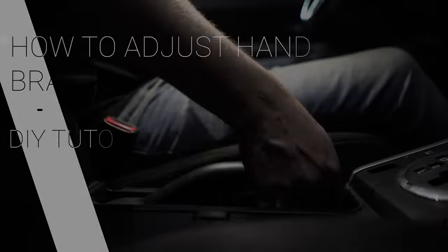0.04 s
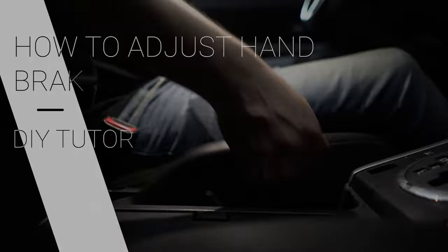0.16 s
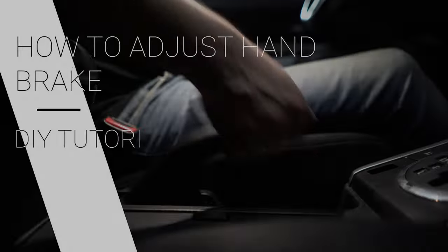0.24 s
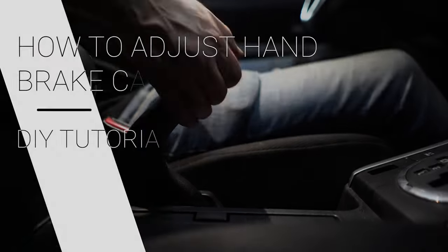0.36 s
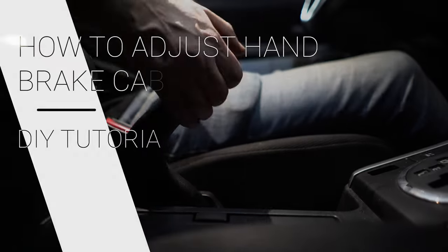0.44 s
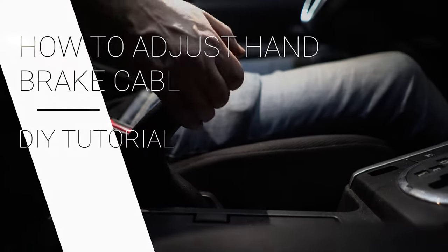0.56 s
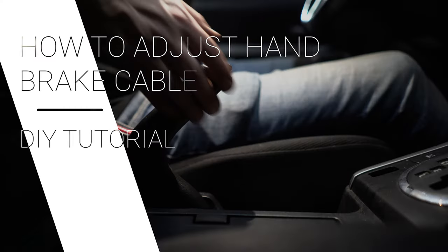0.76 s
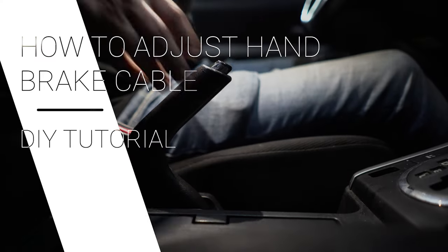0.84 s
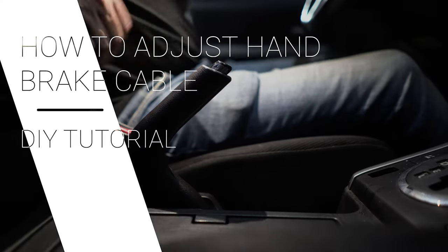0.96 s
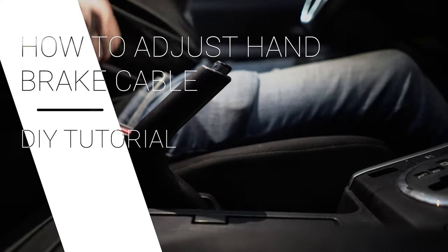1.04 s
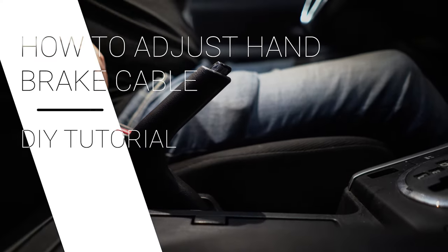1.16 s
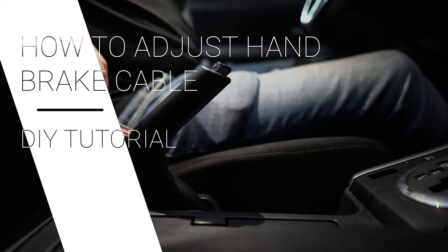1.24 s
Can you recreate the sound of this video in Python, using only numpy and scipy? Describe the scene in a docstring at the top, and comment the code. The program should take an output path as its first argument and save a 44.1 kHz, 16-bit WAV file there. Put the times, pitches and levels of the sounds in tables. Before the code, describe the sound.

Close stereo inside a still car cabin: faint soft thuds, then a fast crisp handbrake ratchet with hollow console knocks, a faint ring, a tiny squeak, and soft bumps as the hand lets go.

```python
"""Quiet parked-car cabin, seat rumble and a thud, then a handbrake pulled up over fifteen teeth.
The snaps quicken and slow again: bursts of coloured noise with tuned resonances of the ratchet plate,
the lever and the console, over a faint ring. Then the hand lets go with soft ticks, thuds and bumps
and one short squeak, while a sleeve rustles in filtered noise. Stereo, heard from inside the cabin."""
import sys
import numpy as np
from scipy import signal
from scipy.fft import rfft, irfft
from scipy.io import wavfile
from scipy.ndimage import uniform_filter1d

SR = 44100
rng = np.random.default_rng(int(sys.argv[2]) if len(sys.argv) > 2 else 0)


def store_wav(level_fs):
    """Save 16-bit WAV to argv[1]."""
    pcm = np.round(np.clip(np.atleast_2d(level_fs), -1, 1) * 32767)
    wavfile.write(sys.argv[1], SR, pcm.T.astype(np.int16))


N = 57330
T = np.arange(N) / SR
CUTOFF_HZ = 16000

# the pawl drops off each tooth: t/s, relative crack level/dB, relative knock level in the console/dB,
# treble tilt/dB per octave
PAWL_DROPS = [(0.2291, -5, 6.5, -0.5), (.2510, -4, 8, -0.5), (0.2672, -1.5, 3.5, -1),
              (0.2822, -3.5, 4.5, 0.5), (.2950, -1, 4, -.5), (0.307, -1, 3, 1), (0.3186, -1, 4, -2),
              (0.33, -2.5, -5.5, 2), (0.3401, 1, 3, 1.5), (0.351, 0.5, -0.5, -1), (0.3596, -1.5, -7, 1),
              (.3700, 0, 4.5, -1), (.3840, -4, 3.5, 1), (.4030, -2, 3, 1.5), (.4380, -5, -2, 0.5)]


def from_db(db):
    """Decibels to gain."""
    return 10 ** (np.asarray(db) / 20)


def rms_one(x):
    """Scale to unit rms."""
    return x / np.sqrt(np.mean(x ** 2) + 1e-20)


def at_hz(points, hz):
    """Read a table on a log-frequency axis."""
    f, v = np.transpose(points)
    return np.interp(np.log(np.maximum(hz, 1)), np.log(f), v)


def level(points):
    """Gain over time from rows of t/s, level/dB."""
    return from_db(np.interp(T, *np.transpose(points)))


def drift(rate):
    """Smooth random motion of rms 1: white noise averaged over 1/rate seconds."""
    return rms_one(uniform_filter1d(rng.standard_normal(N), max(1, int(SR / rate))))


def pan(hz):
    """Left and right gains of the cabin at these frequencies."""
    # f/Hz, level left minus right/dB
    side_balance = [(250, -0.5), (550, 0), (1000, -3), (2000, 0.1), (4000, 0.5), (8000, -4.4), (12000, 0.5)]
    return from_db(np.outer([.5, -.5], at_hz(side_balance, hz)))


def noise(spectrum):
    """Coloured stereo noise, alike in the bass and diffuse in the treble; rms 1."""
    # f/Hz, left-right correlation
    likeness = [(100, .999), (250, 0.96), (500, 0.88), (1000, 0.64), (2000, .28), (4000, 0.02),
                (12000, .02)]
    hz = np.fft.rfftfreq(N, 1 / SR)
    mid, side = np.exp(2j * np.pi * rng.random((2, len(hz))))
    alike = at_hz(likeness, hz)
    pair = np.sqrt(1 + alike) * mid + np.outer([1, -1], np.sqrt(1 - alike) * side)
    colour = from_db(at_hz(spectrum, hz)) * (hz < CUTOFF_HZ)
    return rms_one(irfft(pair * pan(hz) * colour, N))


def add(out, s, sound):
    """Mix a sound in at time s."""
    i = max(0, int(s * SR))
    out[:, i:i + sound.shape[1]] += sound[:, :N - i]


def burst(t, rise, hold, t60):
    """Rise, stay up until the hold time while the first reflections arrive, then die away."""
    return np.clip(t / rise, 0, 1) * from_db(-60 * np.maximum(t - hold, 0) / t60)


def touches(rows, spectrum, rise, hold, t60):
    """Light contacts (t/s, level/dB) that share one noise colour and decay."""
    return noise(spectrum) * sum(from_db(db) * burst(T - s, rise, hold, t60) for s, db in rows)


def background():
    """Quiet cabin background: coloured noise under a slow level curve."""
    # f/Hz, relative level/dB per Hz
    air_colour = [(30, -14), (90, 4), (250, -7), (500, -6), (800, -7), (1050, -0.5), (1350, 3.5),
                  (1650, -15.5), (2600, -13.5), (4000, -24), (9000, -51.5), (15000, -45)]
    # t/s, level/dB
    air_level = [(0, -76.5), (.2, -68), (.6, -64), (1.3, -68)]
    return level(air_level) * noise(air_colour)


def seat():
    """Low rumble of the seat and body as the driver moves: bass-heavy noise."""
    # t/s, level/dB
    seat_level = [(0, -83.5), (.12, -71), (.21, -60), (.5, -58.5), (.68, -63), (.86, -72), (1.02, -61),
                  (1.11, -61), (1.18, -74.5), (1.3, -61.5)]
    # f/Hz, relative level/dB per Hz
    rumble_colour = [(25, -13), (50, 1), (90, -0.5), (160, -8), (280, -14.5), (600, -25), (2000, -68)]
    return level(seat_level) * noise(rumble_colour)


def sleeve():
    """Cloth rubs in noise whose level flutters quickly about a slower curve."""
    # t/s, level/dB before the flutter
    sleeve_level = [(0, -91.5), (.18, -85), (.6, -84), (.73, -76.5), (.80, -71.5), (.86, -82.5),
                    (1.03, -76), (1.13, -70), (1.2, -68), (1.27, -68), (1.3, -73)]
    # f/Hz, relative level/dB per Hz
    cloth_colour = [(300, 4), (1500, -0.5), (4000, 1.5), (8000, -0.5), (12000, -6.5), (15500, -9.5)]
    flutter = from_db(1.4 * drift(250))
    return level(sleeve_level) * flutter * noise(cloth_colour)


def thuds():
    """Dull decaying sines: soft thuds before the pull and after it."""
    # t/s, level/dB, f/Hz, t60/s
    thud_rows = [(0.019, -65, 289, 0.055), (.104, -59.5, 472, 0.055), (0.174, -58.5, 416, 0.042),
                 (.958, -44.5, 113, 0.048), (.960, -56, 201.6, 0.24), (1.038, -77, 128, .2),
                 (1.076, -56.5, 49, 0.55), (1.211, -64, 139, 0.076), (1.237, -53, 229, 0.1)]
    rise_s = 0.0037
    out = np.zeros(N)
    for s, db, hz, t60 in thud_rows:
        envelope = burst(T - s, rise_s, rise_s, t60)
        out += from_db(db) * envelope * np.sin(2 * np.pi * hz * (T - s))
    return out


def button():
    """Light plastic ticks of the grip and button: short bright noise bursts."""
    # t/s, level/dB
    button_ticks = [(.100, -78), (.143, -71), (.171, -80), (.2075, -57), (.996, -63)]
    # f/Hz, relative level/dB per Hz
    plastic_colour = [(1200, 1), (2600, 5.5), (4000, 1), (7000, 2.5), (10000, -23), (15000, -10)]
    return touches(button_ticks, plastic_colour, rise=.001, hold=.005, t60=.05)


def trim():
    """The hand brushes and bumps the trim: soft, dull noise bursts."""
    # t/s, level/dB
    trim_bumps = [(.172, -67.5), (1.040, -75), (1.092, -66.5), (1.204, -55.5), (1.220, -66)]
    # f/Hz, relative level/dB per Hz
    bump_colour = [(80, -3), (250, -2), (600, -0.5), (1000, -1), (1700, -5), (2300, -9.5), (3300, -13),
                   (5000, -21), (8000, -46), (15000, -57)]
    return touches(trim_bumps, bump_colour, rise=.002, hold=.008, t60=0.11)


def linkage():
    """Small knocks of the linkage: noise bursts strongest in the midrange."""
    # t/s, level/dB
    linkage_ticks = [(.2075, -59.5), (.898, -56), (.903, -58.5), (.953, -59), (.959, -60)]
    # f/Hz, relative level/dB per Hz
    tick_colour = [(200, -11), (650, -12), (900, 6), (1500, -2.5), (2250, 7), (2900, -12.5), (5000, -8),
                   (8000, -13.5), (12000, -18), (15500, -57)]
    return touches(linkage_ticks, tick_colour, rise=.001, hold=.002, t60=0.079)


def tooth_colour(hz):
    """Every tooth favours its own narrow patches of the treble."""
    spread_db, width_hz, full_from_hz = 3.3, 240, 2000
    knots = np.arange(0, SR / 2, width_hz)
    patches = np.interp(hz, knots, rng.standard_normal(len(knots)))
    patches = patches * np.minimum(hz / full_from_hz, 1)
    return rms_one(from_db(spread_db * patches))


def pawl(size=8192):
    """Each snap excites the ratchet's dense, short-lived resonances, partly the same on every tooth."""
    # f/Hz, relative level/dB per Hz
    crack_colour = [(120, -9.5), (310, -5), (520, -4.5), (750, -5.5), (1050, -1.5), (1400, -7),
                    (2000, -4.5), (2800, -2.5), (3500, -3.5), (4700, -2), (6000, -1.5), (7600, -2),
                    (8500, -7.5), (12000, -8.5), (15500, -16.5)]
    # f/Hz, t60/s
    crack_decay = [(200, .06), (1500, 0.069), (5000, 0.046), (14000, 0.034)]
    crack_db, rise_s, hold_s = -28.5, 0.0004, 0.006
    shared_power = 0.36  # share of the crack that is the same on every tooth
    direct_gain, direct_s = 0.37, 0.0014  # the direct snap stands above its reflections
    grain_db, grain_per_s = 1.5, 270
    out, t = np.zeros((2, N)), T[:size]
    hz = np.fft.rfftfreq(size, 1 / SR)

    # overlapping bands, each with its own decay
    centres = np.geomspace(250, 16000, 7)
    bands = np.array([at_hz(np.c_[centres, one], hz) for one in np.eye(len(centres))])
    direct = 1 + direct_gain * np.exp(-(t / direct_s) ** 2)
    decays = np.array([burst(t, rise_s, hold_s, at_hz(crack_decay, c)) for c in centres])
    shapes = direct * decays

    steel = noise(crack_colour)[:, :size]
    for s, db, _, tilt_db in PAWL_DROPS:
        own = noise(crack_colour)[:, :size]
        snap = np.sqrt(shared_power) * steel + np.sqrt(1 - shared_power) * own
        coloured = rfft(snap) * tooth_colour(hz)
        split = irfft(coloured[:, None] * bands, size)  # side, band, time
        gains = from_db(crack_db + db + tilt_db * np.log2(centres / 4000))
        crack = (split * shapes * gains[:, None]).sum(1)
        grain = from_db(grain_db * drift(grain_per_s)[:size])
        add(out, s, crack * grain)
    return out


def plate(size=8192):
    """Moving along the toothed plate, the pawl rings each mode most near its antinode."""
    # modes of the steel plate: f/Hz, level/dB before each tooth's crack level, t60/s, antinode t/s
    plate_modes = [ (908, -40, .19, .375), (1270, -42, .04, .405), (1580, -33, .035, .45),
                   (1700, -33, .05, .445), (2540, -41, .04, .22), (2890, -38, .07, .325),
                   (4230, -40, .04, .235), (4900, -39, .05, .395), (2016, -40.5, 0.076, .29),
                   (2260, -51, 0.085, 0.33), (2564, -46.5, 0.27, 0.35), (2843, -34.5, .04, 0.29),
                   (3660, -52, .05, 0.5), (4720, -39, 0.072, 0.3), (5890, -42.5, 0.065, 0.2)]
    antinode_s, node_loss_db = .03, 12
    rise_s, hold_s = 0.0023, 0.0061  # the ring builds up in the cabin's first reflections
    out, t = np.zeros((2, N)), T[:size]
    for hz, db, t60, best_s in plate_modes:
        ringing = pan([hz]) * burst(t, rise_s, hold_s, t60)
        for s, crack_db, _, _ in PAWL_DROPS:
            away = 1 - np.exp(-.5 * ((s - best_s) / antinode_s) ** 2)
            gain = from_db(crack_db + db - node_loss_db * away)
            phase = rng.random() + .5 * rng.random((2, 1))  # in cycles, different on each side
            add(out, s, gain * ringing * np.sin(2 * np.pi * (hz * t + phase)))
    return out


def lingering_ring():
    """Every snap adds power to a faint, slowly dying ring of the springs and steel."""
    # f/Hz, relative level/dB per Hz
    ring_colour = [(35, -15), (80, -16), (150, 2.5), (300, 3), (450, 0), (750, 1), (1250, -0.5), (1700, -8),
                   (2400, -5), (3200, -15.5), (4000, -1), (5200, -15.5), (7600, -12), (9000, -24),
                   (15000, -36.5)]
    ring_db, rise_s, t60_s = -62.5, 0.0052, 1.55
    power = np.zeros(N)
    for s, db, _, _ in PAWL_DROPS:
        power += (from_db(db) * burst(T - s, rise_s, rise_s, t60_s)) ** 2
    return from_db(ring_db) * np.sqrt(power) * noise(ring_colour)


def strike(s, db, hz, t60, sign):
    """Blows at times s set one resonator ringing, a little differently every time."""
    scatter_db = 4
    clicks = np.full(N, 1e-18)  # tiny floor keeps the filter off zero
    blow_db = db + scatter_db * rng.standard_normal(len(s))
    clicks[(s * SR).astype(int)] = sign * from_db(blow_db)
    r = from_db(-60 / (t60 * SR))  # decay per sample
    w = 2 * np.pi * hz / SR
    return pan([hz]) * signal.lfilter([.5, 0, -.5], [1, -2 * r * np.cos(w), r * r], clicks)


def console():
    """The snaps knock the lever and console; the balance of modes shifts as the lever rises."""
    # modes of console and lever: f/Hz, level/dB before each tooth's knock level, t60/s,
    # level gained from first tooth to last/dB
    lever_modes = [(89.7, -49.5, 0.21, 5), (157.4, -37.5, 0.054, 10), (193.8, -38.5, 0.078, 1.5),
                   (287.1, -48, .1, 6.5), (368, -47, 0.062, 10), (437.2, -49, 0.2, 3.5),
                   (475, -44, .08, -3.5), (558, -46, 0.13, -6.5), (612, -46.5, 0.066, -9.5),
                   (1031, -53.5, 0.19, -7.5), (1248, -49, 0.051, 11)]
    delay_s = 0.0022  # knock after crack
    s, _, knock_db, _ = np.transpose(PAWL_DROPS)
    travel = np.linspace(-.5, .5, len(s))
    out = np.zeros((2, N))
    for k, (hz, db, t60, gained_db) in enumerate(lever_modes):
        blow_db = knock_db + db + gained_db * travel
        out += strike(s + delay_s, blow_db, hz, t60, sign=(-1) ** k)
    return out


def squeak():
    """A short squeak of the grip: a sine of unsteady pitch under a bell-shaped swell."""
    centre_s, spread_s, pitch_hz, peak_db = .811, 0.0077, 1069, -55
    swell = from_db(peak_db) * np.exp(-.5 * ((T - centre_s) / spread_s) ** 2)
    hz = pitch_hz * (1 + 0.083 * drift(400))
    return swell * np.sin(2 * np.pi * np.cumsum(hz) / SR)


def scene():
    """Everything heard inside the car: cabin, hand and ratchet."""
    cabin = background() + seat() + sleeve()
    hand = thuds() + button() + trim() + linkage() + squeak()
    ratchet = pawl() + plate() + lingering_ring() + console()
    return cabin + hand + ratchet


def record(dry):
    """The microphone thins the deep bass; the top is cut steeply."""
    low_cut = signal.butter(2, 45, "high", fs=SR, output="sos")
    top_cut = signal.ellip(10, .2, 80, CUTOFF_HZ, fs=SR, output="sos")
    return signal.sosfilt(top_cut, signal.sosfilt(low_cut, dry))


dry = scene()
out = record(dry)
store_wav(out)
```